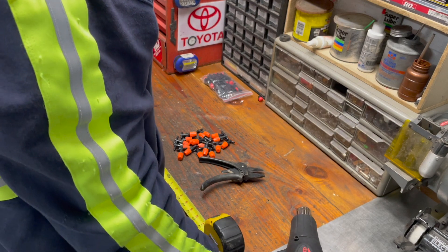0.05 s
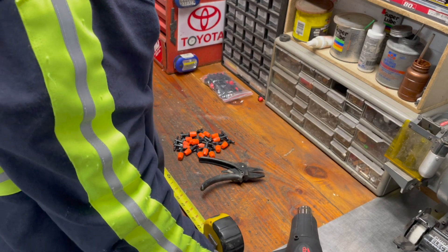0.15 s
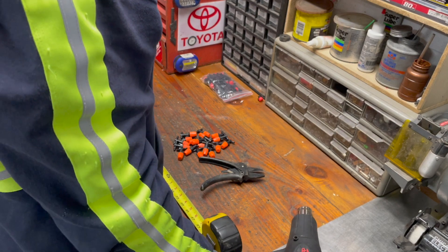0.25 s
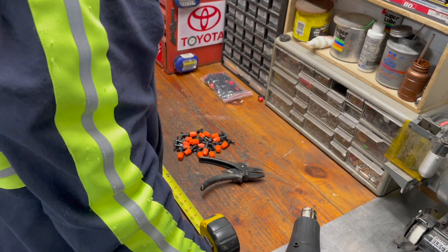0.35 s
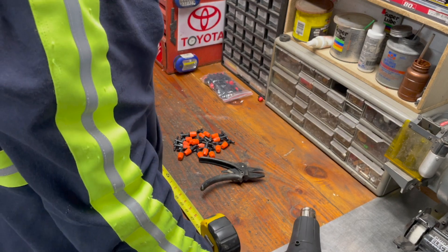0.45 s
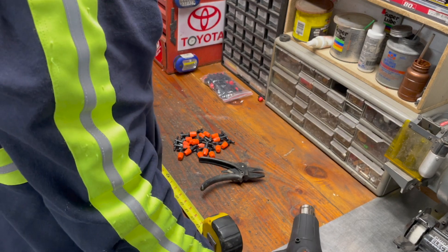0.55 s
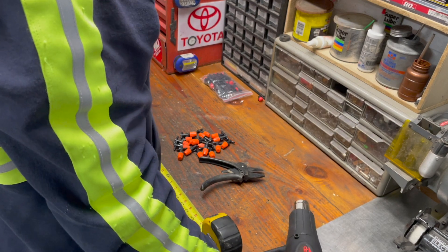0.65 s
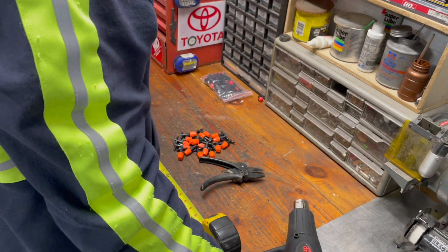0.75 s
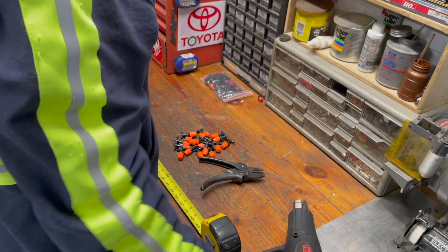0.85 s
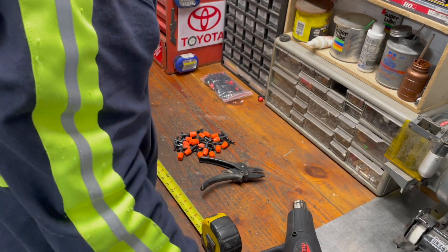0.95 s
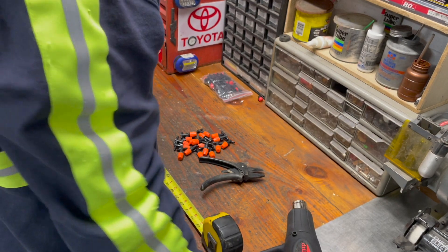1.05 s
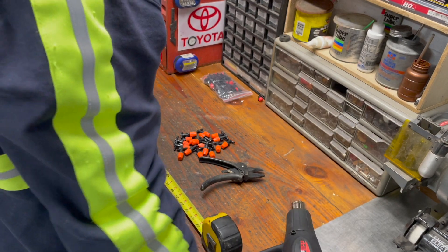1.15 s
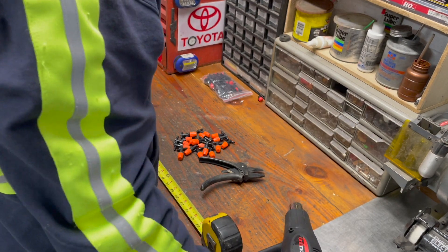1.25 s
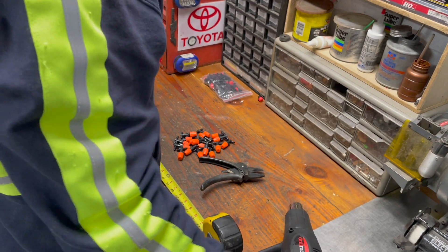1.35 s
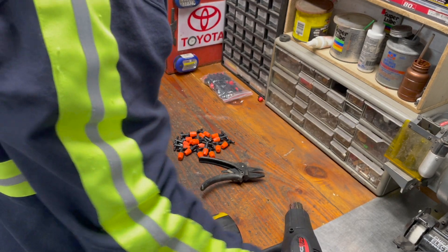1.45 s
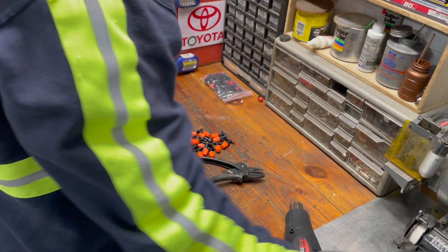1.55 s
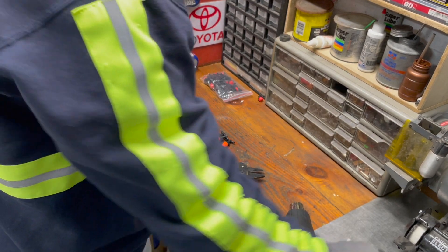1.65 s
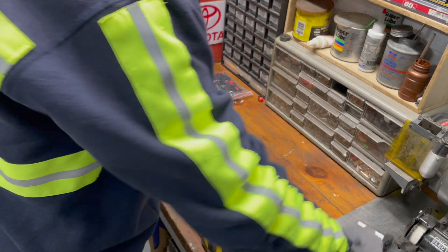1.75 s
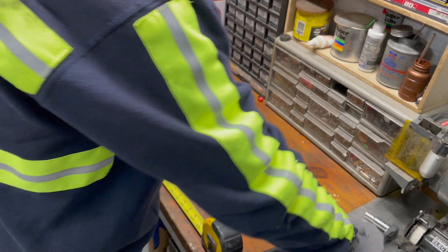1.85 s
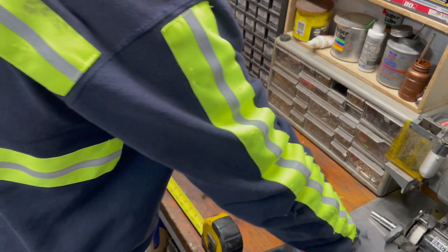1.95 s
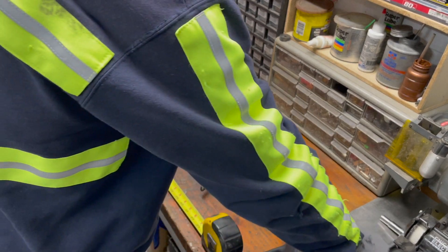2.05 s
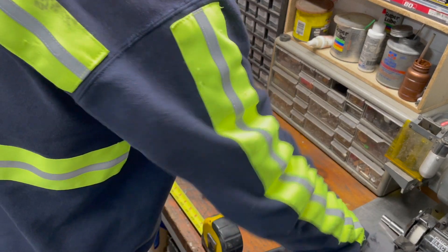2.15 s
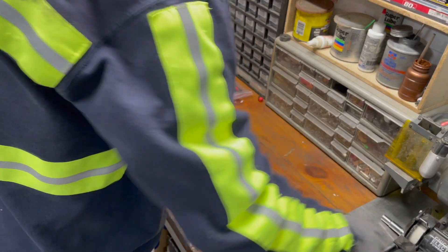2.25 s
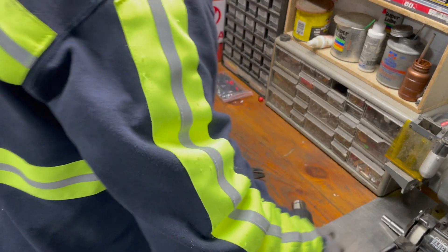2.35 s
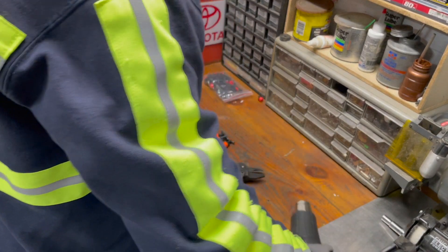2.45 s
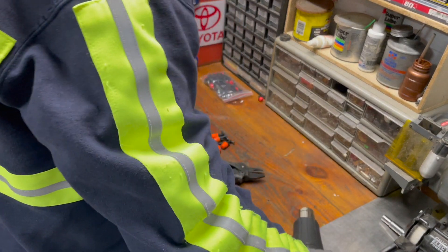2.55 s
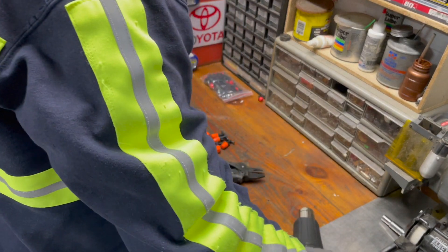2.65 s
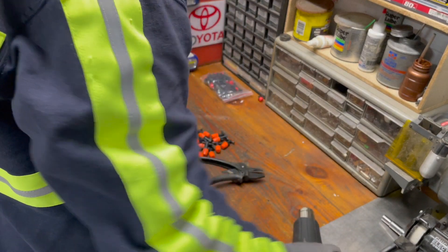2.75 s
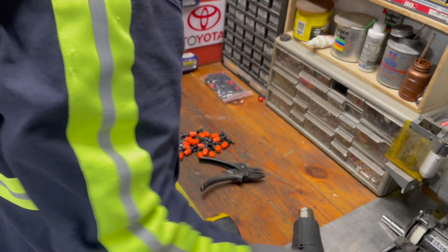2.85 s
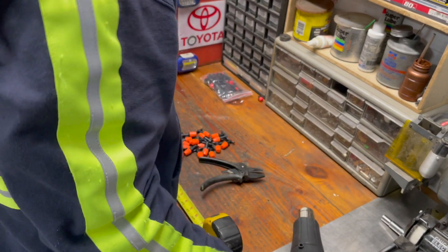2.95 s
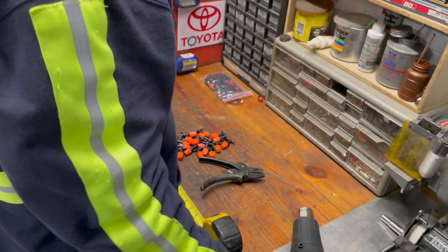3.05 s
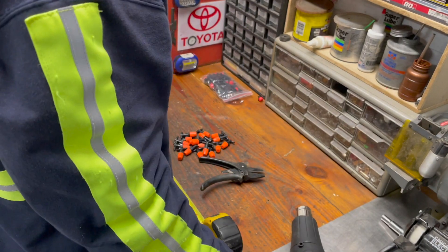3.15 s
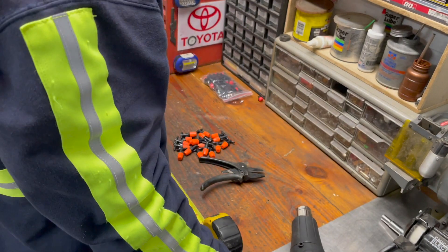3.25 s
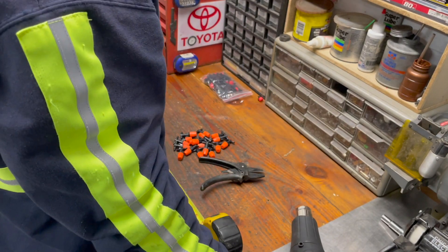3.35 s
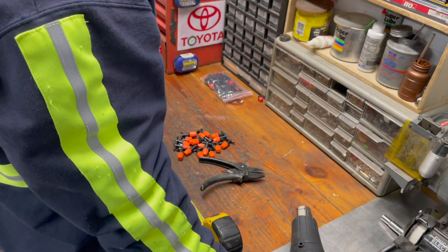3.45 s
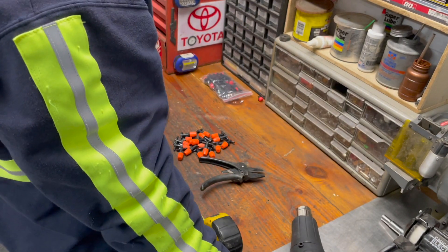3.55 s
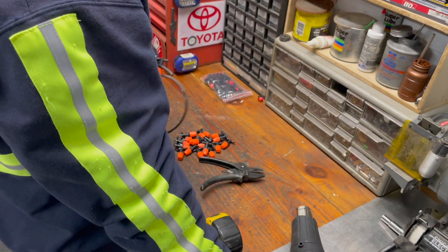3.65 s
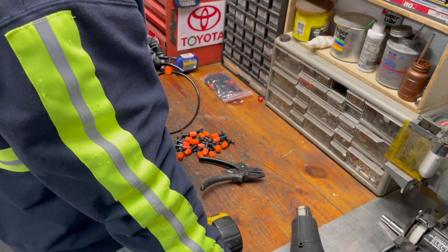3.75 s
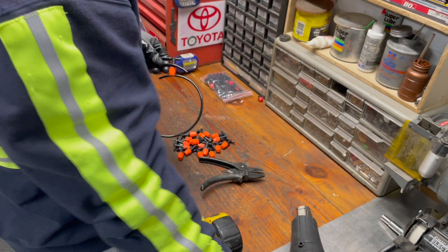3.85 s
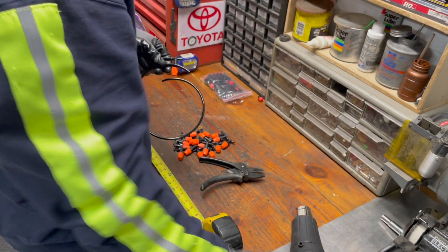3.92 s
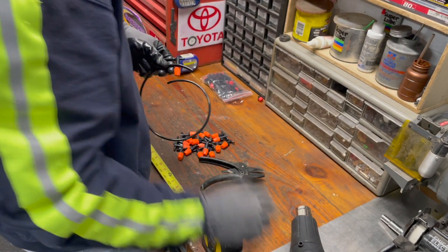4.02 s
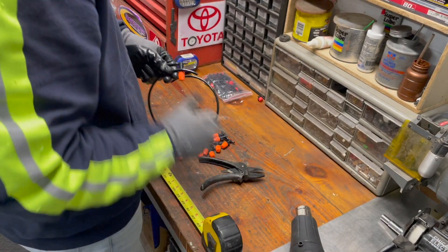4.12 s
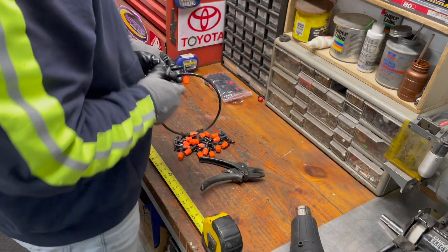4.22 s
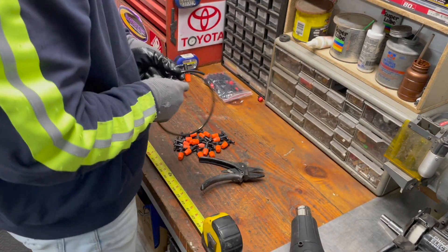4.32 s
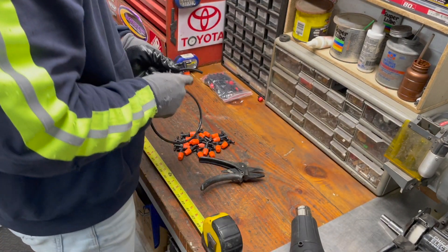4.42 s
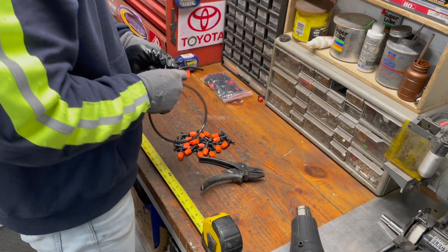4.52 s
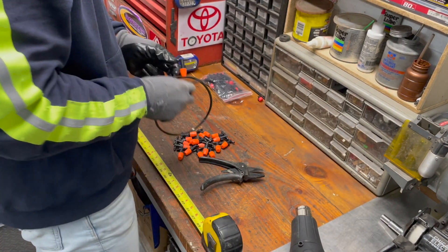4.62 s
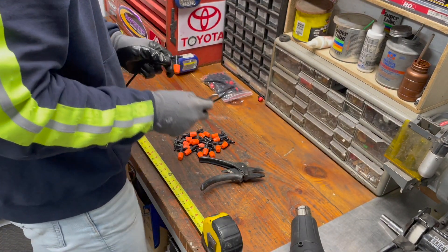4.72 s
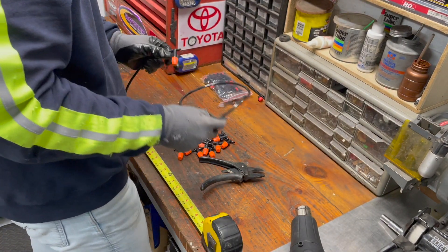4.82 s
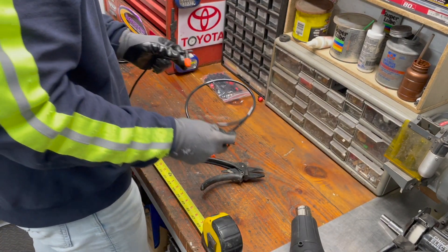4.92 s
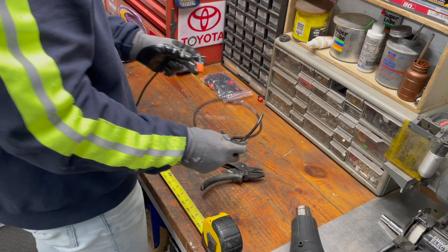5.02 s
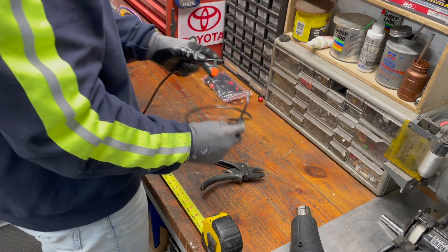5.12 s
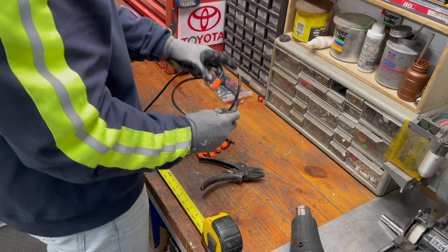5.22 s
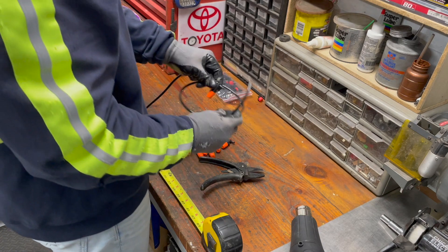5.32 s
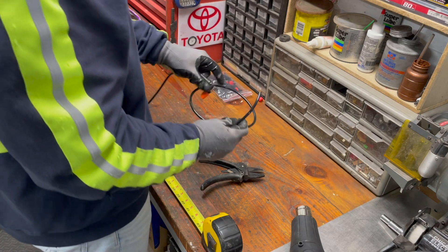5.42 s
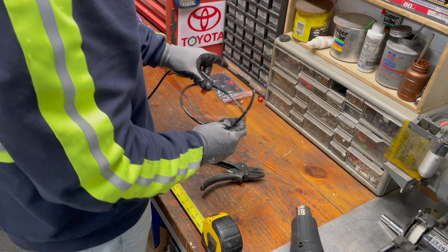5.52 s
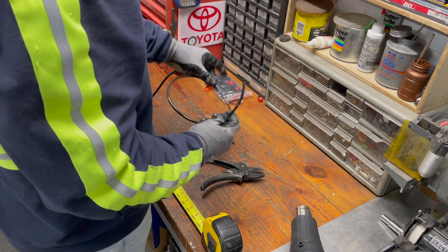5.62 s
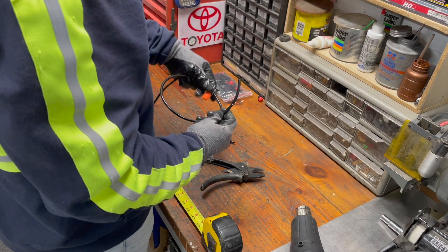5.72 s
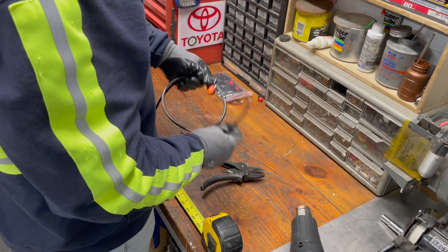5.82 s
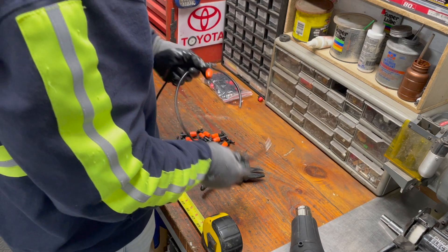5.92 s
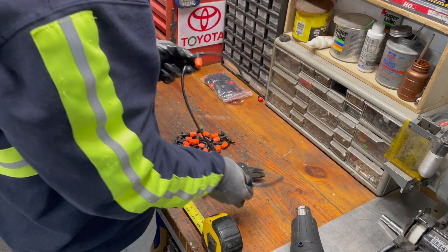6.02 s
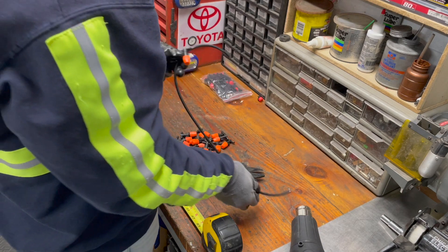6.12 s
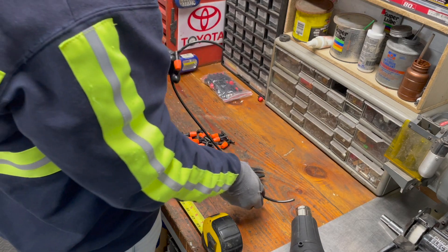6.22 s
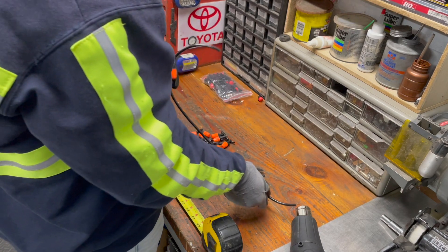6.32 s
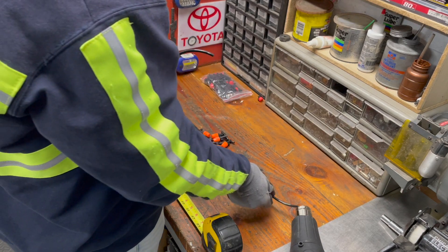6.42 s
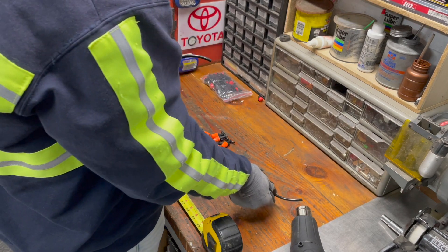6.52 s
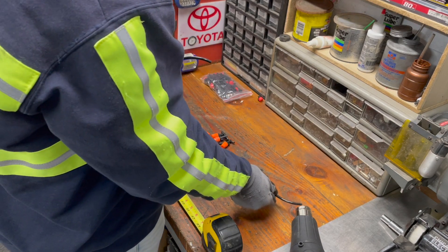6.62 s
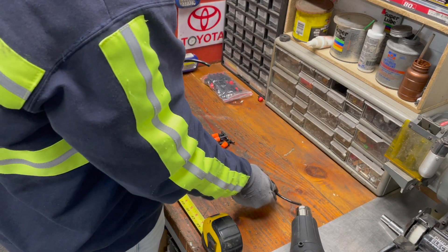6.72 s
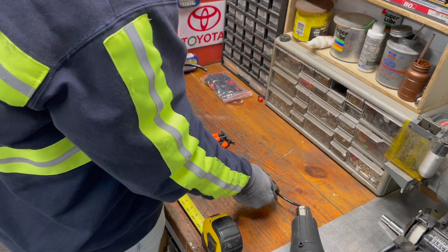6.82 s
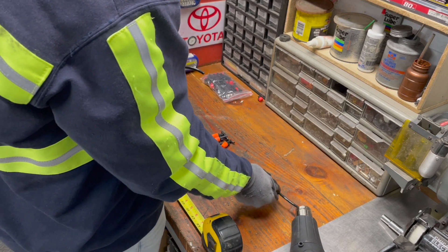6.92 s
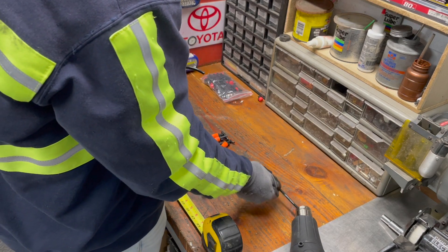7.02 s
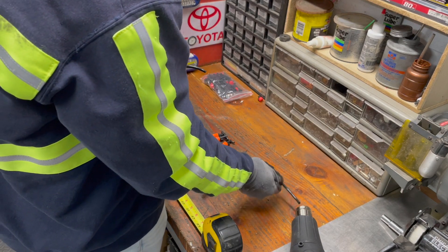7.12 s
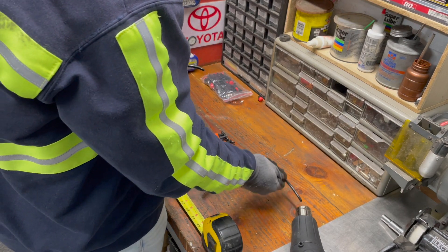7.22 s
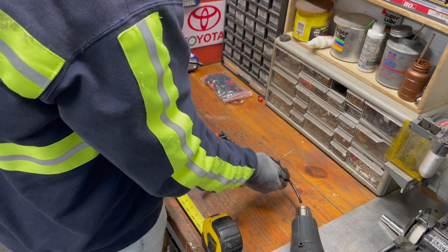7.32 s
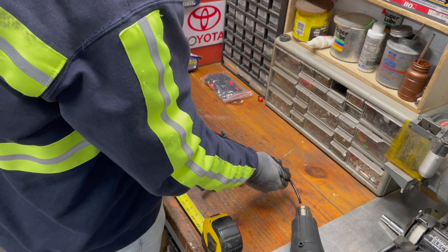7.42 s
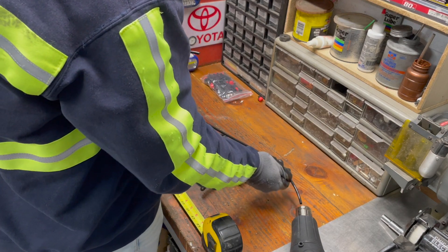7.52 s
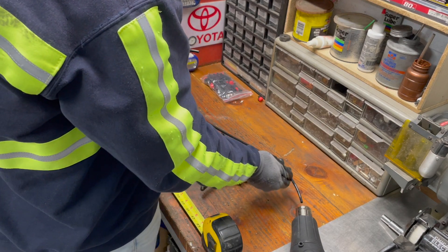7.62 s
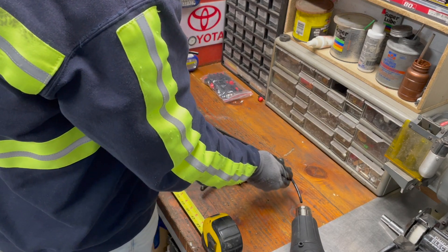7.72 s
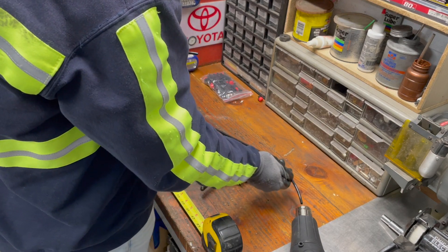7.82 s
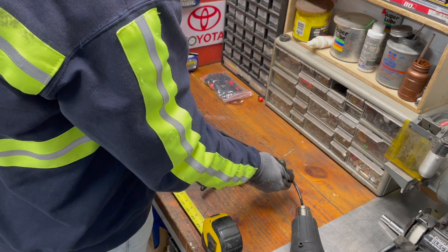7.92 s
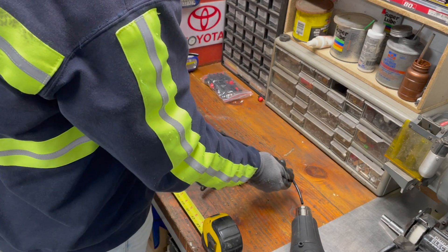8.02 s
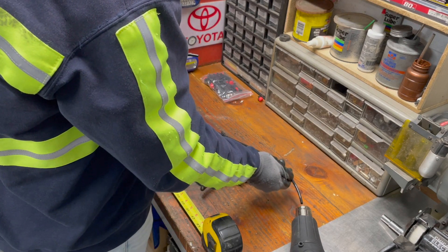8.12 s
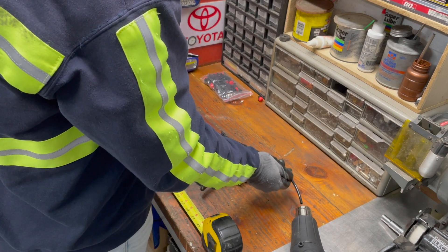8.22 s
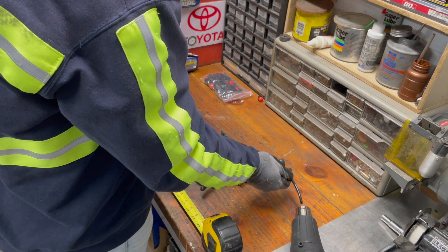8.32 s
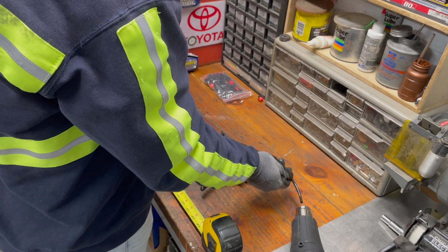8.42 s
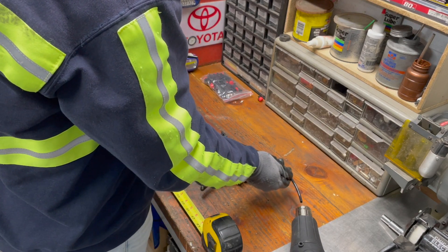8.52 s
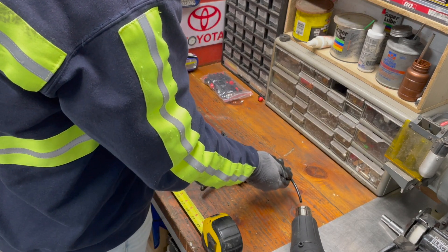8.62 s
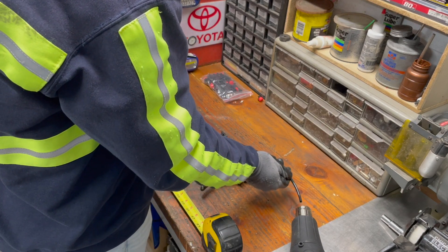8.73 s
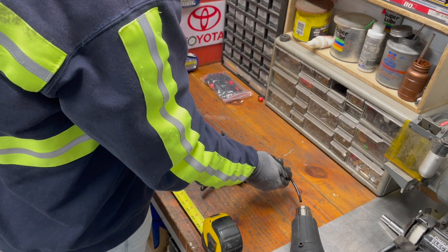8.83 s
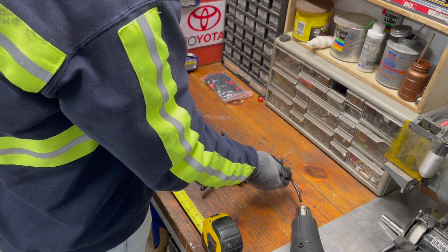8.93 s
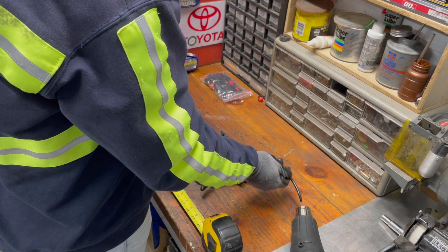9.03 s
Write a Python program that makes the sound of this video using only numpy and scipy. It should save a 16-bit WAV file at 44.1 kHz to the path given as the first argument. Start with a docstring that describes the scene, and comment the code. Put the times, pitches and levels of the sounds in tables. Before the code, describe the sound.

In a small garage, a hard plastic heat gun is shoved about on a wooden bench with uneven knocks, thuds, scrapes and faint squeaks. The handling thins out, a switch clicks crisply, and the fan quickly whines up to a steady tonal hum with rushing air. Close stereo pickup, short room reflections.

```python
"""From the start, over faint garage noise, a heat gun is shoved about and set down on a wooden bench.
Knocks excite modes of housing and board and a bench thud; stick-slip ticks make scrapes, with small squeaks.
At 3.65 s the switch snaps and bounces as brief impulses through stiff resonances.
Then the fan spins up: tones at multiples of the shaft speed over rushing air, shaped noise.
A close pair of microphone ports hears it, with the garage's decaying reflections of the handling."""
import sys
import numpy as np
from scipy import signal
from scipy.fft import rfft, irfft, next_fast_len
from scipy.io import wavfile
from scipy.ndimage import uniform_filter1d

SR = 44100
rng = np.random.default_rng(int(sys.argv[2]) if len(sys.argv) > 2 else 0)


def materialize(psi):
    """Save the field psi as 16-bit PCM at rate SR to the path in sys.argv[1].

    A 1-D psi becomes a single channel; in a 2-D psi each row is a channel.
    """
    bounded = np.clip(np.atleast_2d(psi).T, -1, 1)
    quanta = np.round(bounded * 32767).astype(np.int16)
    wavfile.write(sys.argv[1], SR, quanta)


N = 399987  # samples


def amp(db):
    """Level law: decibels to amplitude ratio."""
    return 10 ** (np.asarray(db) / 20)


def evened(x):
    """Normalisation to an rms of 1."""
    return x / np.sqrt(np.mean(x ** 2) + 1e-20)


def read(points, hz):
    """Spectral interpolation: a table's value, linear in log frequency."""
    f, value = np.transpose(points)
    return np.interp(np.log(hz + 1), np.log(f + 1), value)


def add(mix, s, sound):
    """Superposition: a sound joins the mix at s seconds."""
    part = mix[max(round(s * SR), 0):][:len(sound)]
    part += sound[:len(part)]


def curves(rows):
    """Linear interpolation in time: the columns of a table at every sample."""
    s, *columns = np.transpose(rows)
    return [np.interp(np.arange(N) / SR, s, c) for c in columns]


def wander(per_s):
    """Slow random modulation of about rms 1, smoothed from 2 * per_s steps a second."""
    steps = uniform_filter1d(rng.standard_normal(int(N / SR * per_s * 2) + 4), size=2)
    return np.interp(np.linspace(0, len(steps) - 1, N), np.arange(len(steps)), evened(steps))


def colour(x, points):
    """Minimum-phase filtering: a causal spectral shape that keeps the rms of white noise."""
    log_gain = np.log(amp(read(points, abs(np.fft.fftfreq(4096, 1 / SR)))))
    taps = np.fft.ifft(np.exp(np.conj(signal.hilbert(log_gain)))).real[:2048]
    return signal.oaconvolve(x, taps / np.linalg.norm(taps))[:len(x)]


def thin(x, low_hz):
    """Weak low radiation: a third-order high-pass removes what a small part barely radiates."""
    return signal.sosfilt(signal.butter(3, low_hz, "high", fs=SR, output="sos"), x)


def ring(x, modes, spot_hz=1200, focus_db=0, detune=1):
    """Modal synthesis that keeps white noise's rms; focus_db weakens modes away from the spot's pitch."""
    hz, width, db = np.transpose(modes)[:, :, None]
    t = np.arange(3000) / SR
    gain = amp(db - focus_db * np.log2(hz / spot_hz) ** 2) * np.sqrt(width)
    decay = np.exp(-np.pi * width * t)
    taps = (gain * decay * np.sin(2 * np.pi * hz * detune * t)).sum(0)
    return signal.oaconvolve(x, taps / np.linalg.norm(taps))[:len(x)]


def resonate(x, hz, width):
    """Heterodyning: shift the curve hz to zero, smooth and shift back, as a moving resonance."""
    turn = np.exp(2j * np.pi * np.cumsum(hz) / SR)
    r = np.exp(-np.pi * width / SR)
    smooth = signal.lfilter([1 - r], [1, -r], x / turn)
    return evened((turn * smooth).real)


# Left-right likeness of diffuse sound. Each row: frequency in Hz, correlation from 0 to 1.
LIKENESS = [(60, 0.99), (200, 0.43), (600, 0.67), (1500, 0.33), (4000, 0.61), (6500, 0.022)]


def diffuse(points, patchy_db, tilt_db=0):
    """Partial coherence: two-channel noise from random spectra with patches; tilt_db varies the treble."""
    frames, hz = N // 256 + 5, np.fft.rfftfreq(1024, 1 / SR)
    a, b, c, d, patches = rng.standard_normal((frames, 513, 5)).T
    patches = uniform_filter1d(patches, size=8, axis=0)
    patches = evened(uniform_filter1d(patches, size=16, axis=1))
    same = np.clip(read(LIKENESS, hz), -1, 1)[:, None]
    left = a + 1j * b
    right = same * left + np.sqrt(1 - same ** 2) * (c + 1j * d)
    treble = np.clip(np.log2(hz / 1500 + 1e-9), 0, 1)
    tilt_frames = np.pad(tilt_db * np.ones(N), (0, 2048), "edge")[::256][:frames]
    z = np.array([left, right])
    z *= amp(read(points, hz)[:, None] + patchy_db * patches + np.outer(treble, tilt_frames))
    return evened(signal.istft(z, nperseg=1024, noverlap=768)[1][:, :N])


# Spectrum of the garage's background. Each row: frequency in Hz, density in dB per Hz (relative).
GARAGE_COLOUR = [(20, -3.5), (35, 1), (52, 18), (75, -26), (120, -3), (300, -14.5), (1200, -30.5),
                 (4000, -32.5), (12000, -33.5), (16000, -61.5)]
GARAGE_DB = -53.5


def garage():
    """Ambient diffuse field: steady low-heavy noise with slight drifting patches."""
    return amp(GARAGE_DB) * diffuse(GARAGE_COLOUR, patchy_db=1.5)


# Decay of the garage. Each row: frequency in Hz, time to fall by 60 dB in seconds.
ROOM_T60 = [(100, 0.24), (500, 0.34), (2000, 0.29), (6000, 0.26), (12000, 0.21)]


def room(x):
    """Reverberant decay: three alternately fed sparse tails, each band dying at its own speed."""
    out, turn = 0, np.arange(len(x)) / SR * 2.3
    for k in range(3):
        taps = np.zeros((2, SR // 2))
        slots = np.arange(120, SR // 2 - 20, 20)
        at = slots + rng.integers(0, 20, (2, (SR // 2 - 121) // 20))
        np.put_along_axis(taps, at, rng.choice([-1., 1.], at.shape), 1)
        hz, t, z = signal.stft(taps, SR, nperseg=512)
        same = np.clip(read(LIKENESS, hz), -1, 1)[:, None]
        z[1] = same * z[0] + np.sqrt(1 - same ** 2) * z[1]
        decay = amp(-60 * t / read(ROOM_T60, hz)[:, None])
        tail = signal.istft(z * decay, SR, nperseg=512)[1]
        feed = np.sqrt(2 / 3) * np.cos(2 * np.pi * (turn + k / 3))
        wet = signal.fftconvolve((feed * x)[None], tail / np.linalg.norm(tail[0]), axes=1)
        out = out + wet[:, :N]
    return out


# Bounce off the bench top. Each row: frequency in Hz, lead of the right port in half turns.
BENCH_TURN = [(500, 0), (2000, .2), (3100, -.2), (4000, -.07), (5000, -.15), (6000, 0)]


def off_bench(x):
    """Reflection phase: direct sound at two ports, the bench bounce turning the right one's phase."""
    size = next_fast_len(N)
    turn = np.exp(1j * np.pi * read(BENCH_TURN, np.fft.rfftfreq(size, 1 / SR)))
    return np.array([x, irfft(rfft(x, size) * turn, size)[:N]])


SWITCH_S = 3.655  # the rattle of the switch and the start of the fan
# The shaft's approach to speed. Each row: gap in Hz at the switch, time constant in seconds.
SPEED_LAGS = [(166.5, .234), (10.27, 1.5)]
FULL_HZ, FAN_FADE_S = 189.7, 0.19


def fan():
    """Exponential approach: seconds since the switch, fade from silence, and shaft speed in Hz."""
    t = np.maximum(np.arange(N) / SR - SWITCH_S, 0)
    hz = FULL_HZ - sum(gap * np.exp(-t / lag) for gap, lag in SPEED_LAGS)
    return t, np.minimum(t / FAN_FADE_S, 1) ** 2, hz


# Spectrum of the rushing air. Each row: frequency in Hz, density in dB per Hz (relative).
AIR_COLOUR = [(55, -27.5), (120, -16), (260, -17.5), (350, -16.5), (520, -6), (635, -8.5), (700, -4.5),
              (800, 2.5), (880, -9), (950, 1.5), (1020, -3), (1200, -4.5), (1420, -12), (2200, -15),
              (2560, -12.5), (2950, -18), (3350, -16.5), (3900, -19.5), (4350, -18), (4900, -26),
              (7000, -23.5), (12000, -29), (14000, -39), (16000, -44)]
AIR_DB, AIR_DB_PER_OCTAVE = -38.5, 16.5  # at full speed, and growth per octave of shaft speed
TREBLE_DB, TREBLE_DB_PER_S = -2, 0.06  # the treble creeps up


def fan_air():
    """Turbulence noise: air through the barrel grows steeply with shaft speed."""
    t, fade, hz = fan()
    level = fade * amp(AIR_DB + AIR_DB_PER_OCTAVE * np.log2(hz / FULL_HZ))
    return level * diffuse(AIR_COLOUR, patchy_db=1.5, tilt_db=TREBLE_DB + TREBLE_DB_PER_S * t)


# Resonances and dips that raise or lower the tones outside SWELLING, and the strain whine, as they
# glide past. Each row: frequency in Hz, half width in Hz, change in dB.
BARREL = [(349, 12, 11.5), (1170, 77, 12), (1470, 50, 21), (1680, 57, 16), (1830, 70, 22), (2520, 120, 9),
          (2800, 75, -1), (3200, 140, -10), (6360, 290, -11)]


def barrel_db(hz):
    """Resonance curves: the summed rise or dip in dB at a frequency."""
    return sum(db / (1 + ((hz - f) / width) ** 2) for f, width, db in BARREL)


# Loud orders that sit still between the ports. Each entry, by multiple of the shaft speed:
# left minus right in dB, lead of the right in turns.
LOUD_ORDERS = {1: (-4, .03), 5: (-4.5, .03), 8: (1, .01), 9: (-.5, -.02), 10: (-2, .02), 11: (-.5, -.05),
               14: (.5, 0), 20: (-1, -.03)}
# Orders unlike the plain ones. Each entry, by multiple of the shaft speed: level at full speed in dB.
ORDER_DB = {2: -64, 3: -58, 4: -54, 6: -55, 18: -59, 20: -58.5, 23: -67, 28: -69, 31: -72, 33: -67, 35:
            -63.5, 41: -68, 45: -70, 51: -72}
# Multiples of the shaft speed that swell and sink slowly.
SWELLING = [1, 5, 7, 8, 9, 10, 11, 14, 15, 27]
# Their levels. Each row: time in seconds, then the level in dB of each order in SWELLING.
SWELLS = [(3.75, -77, -85, -80, -77, -80, -78, -82, -84, -80, -90),
          (4.0, -41, -66, -68, -66, -66, -60, -72, -79, -80, -82),
          (4.13, -53, -57, -55, -57, -50, -64, -62, -72, -68, -80),
          (4.28, -44, -58, -49, -62, -60, -56, -52, -68, -60, -82),
          (4.45, -53, -56, -57, -56, -62, -59, -55, -66, -65, -84),
          (4.64, -63, -52, -57, -52, -61, -58, -64, -60, -57, -80),
          (4.8, -49, -52, -60, -49, -51, -58, -66, -58, -54, -77),
          (5.05, -48.5, -51, -61, -45, -54, -57, -53, -57, -56, -73),
          (5.4, -50, -41, -58, -45, -50, -50, -56, -59, -60, -69),
          (6.1, -46, -41, -52, -42, -50, -55, -60, -68, -66, -68),
          (7.0, -44, -43, -51, -42.5, -46.5, -51.5, -57, -82, -63, -64),
          (7.6, -44, -52, -52, -41.5, -44.5, -51, -59, -62, -56, -64),
          (8.0, -44, -47, -53, -40.5, -45.5, -52, -64, -53, -58, -61),
          (8.65, -43, -49, -60, -40.5, -46.5, -52, -68, -53, -58, -61.5),
          (9.07, -43, -45, -58, -40, -45.5, -53, -64, -56, -61, -61)]
ORDER_12_DB, ORDER_SLOPE_DB = -64.5, -9.5  # a plain order: the twelfth at full speed, change per octave
SPIN_TREMBLE = 12  # extra tremble while the shaft is short of full speed
STRAIN_ORDER, STRAIN_DB = 15, -72.5  # whines while the motor is far from full speed
STRAIN_TOP_HZ = 1950  # the housing passes the whine up to here
BEATING_ORDER, BEATING_DB = 5, 3  # throbs unevenly in the air stream


def fan_tones():
    """Shaft orders: harmonics swell and fade by standing waves as they glide, differently at each port."""
    t, fade, hz = fan()
    on = t > 0
    t, hz = t[on], hz[on]
    turns = np.cumsum(hz * (1 + 0.001004 * wander(20)[on])) / SR
    few, seconds = hz[::200], t[::200]  # slow curves need few points
    spin_db = 60.0 * np.log10(few / few[-1])  # tones strengthen steeply with speed, high orders most
    ripple = rng.standard_normal((2, 600))  # gain and side lean, one value every 30 Hz
    wavers = rng.standard_normal((84, 30))  # per order, four steps a second
    flutter_db = wander(25)[on]
    trembles = rng.standard_normal((84, 150))  # per order, twenty-five steps a second
    swells = dict(zip(SWELLING, curves(SWELLS)))
    short_of_speed = 1 - hz / FULL_HZ
    out = np.zeros((2, N))
    for k in range(1, 84):
        phase, lead = rng.random(), 0.046 * rng.standard_normal()
        swell, lean = (np.interp(k * few / 30, np.arange(600), r) for r in ripple)
        swell = np.minimum(swell - swell[-400:].mean(), .5)  # dips go deep, peaks do not
        depth_db, pan_db = 2.8, 4 * lean
        if k in LOUD_ORDERS:
            depth_db, (pan_db, lead) = 1.5, LOUD_ORDERS[k]
        if k in swells:
            db = swells[k][on]
        else:
            plain_db = ORDER_12_DB + ORDER_SLOPE_DB * np.log2(k / 12)
            db = ORDER_DB.get(k, plain_db) + (1.0 + 0.11 * k) * spin_db
            db += barrel_db(k * few) - barrel_db(k * few[-1])
            db += depth_db * (swell + .7 * np.interp(4 * seconds, np.arange(30), wavers[k]))
            db = np.interp(t, seconds, db)
        tremble_depth_db = 1.1 * (1 + SPIN_TREMBLE * short_of_speed) * min(k, 5) / 5 * (1 + k / 20)
        tremble_db = tremble_depth_db * np.interp(25 * t, np.arange(150), trembles[k])
        gain = np.sqrt(2) * amp(db + flutter_db + tremble_db)
        side = np.interp(t, seconds, amp(pan_db / 2 + np.zeros(len(few))))
        if k == BEATING_ORDER:
            gain *= amp(BEATING_DB * (wander(24)[on] - .6))
        if k == STRAIN_ORDER:
            whine = amp(STRAIN_DB + barrel_db(k * hz) + 2.5 * wander(30)[on])
            gain += whine * 2 * short_of_speed / (1 + (k * hz / STRAIN_TOP_HZ) ** 10)
        out[0, on] += side * gain * np.sin(2 * np.pi * (k * turns + phase))
        out[1, on] += gain / side * np.sin(2 * np.pi * (k * turns + phase + lead))
    return fade * out


# Stiff modes of the switch. Each row: frequency in Hz, width in Hz, level in dB.
SWITCH_MODES = [(1000, 120, -12), (1490, 170, 4), (1640, 170, 3), (2000, 200, -8), (2400, 250, -1),
                (2720, 400, -1), (3105, 200, 4), (3900, 900, 0), (5060, 380, 2), (5760, 500, -2),
                (6450, 600, 1), (7300, 1300, 2), (10500, 3400, -23)]
# Snaps of the rocker. Each row: time in seconds, relative level in dB.
SNAPS = [(3.648, -28), (3.656, -15), (3.659, 5.5), (3.662, -6), (3.664, -9), (3.671, -18)]
SWITCH_DB, SWITCH_T60, SWITCH_LOW_HZ, SNAP_DB = -20.5, 0.039, 1300, -14.5  # T60 in seconds


def switch():
    """Impulse excitation: the rocker snaps and bounces, with a short rattle, in small stiff parts."""
    out, t = np.zeros(N), np.arange(6000) / SR
    shape = (1 - np.exp(-t / 0.0019)) * amp(-60 * t / SWITCH_T60)
    add(out, SWITCH_S, amp(SWITCH_DB) * shape * rng.standard_normal(len(t)))
    for s, db in SNAPS:
        add(out, s, amp([SNAP_DB + db]))
    return thin(ring(out, SWITCH_MODES), SWITCH_LOW_HZ)


# Chirps of rubbing plastic. Each row: start in seconds, frequency in Hz, level in dB, length in seconds.
SQUEAKS = [(1.344, 1247, -40.5, 0.068), (1.503, 1507, -44, 0.17), (2.096, 1372, -44, 0.11),
           (2.728, 987, -46, 0.066), (3.227, 934, -67, 0.021), (3.388, 2330, -76, 0.029)]


def squeaks():
    """Narrow-band resonance: rubbing plastic gives brief, slightly unsteady tones."""
    out = np.zeros(N)
    for s, hz, db, length in SQUEAKS:
        count = round(length * SR)
        tone = resonate(rng.standard_normal(8000)[:count], np.full(count, hz), width=19)
        add(out, s, amp(db) * np.hanning(count) * tone)
    return out


# The gun's place on the bench. Each row: time in seconds, upper over lower board modes in dB,
# level of the top treble in dB.
BENCH_PLACE = [(0, 2, -4), (.35, -2.5, -3.5), (.64, 4.5, -9.5), (1.0, -6, 3), (1.14, 8, 3.5), (1.3, 0, -5),
               (1.6, 5, 2.5), (1.85, 2, -2.5), (2.06, 9, 4.5), (2.43, 3.5, -3), (2.51, 2.5, -1),
               (3.1, 3, -7.5), (3.6, 1, -1)]
# Board modes, the lower two first. Each row: frequency in Hz, width in Hz, level in dB.
BOARD = [(224.4, 70, -3), (280, 69, -2.5), (357, 60, 1.5), (442, 90, -4), (547, 150, -0.5),
         (760, 140, -12.5)]
BOARD_LOW_HZ = 121


def board_ring(x):
    """Modal participation: where the gun lies shares out the board's lower and upper modes."""
    upper_db = curves(BENCH_PLACE)[0]
    lower = amp(-upper_db / 2 - 8.5) * ring(x, BOARD[:2])
    upper = amp(upper_db / 2 - 3) * ring(x, BOARD[2:])
    return thin(lower + upper, BOARD_LOW_HZ)


def with_treble(x):
    """Spectral shelving: treble above about 9500 Hz rises and falls as the gun moves over the bench."""
    top = signal.sosfiltfilt(signal.butter(3, 9500, "high", fs=SR, output="sos"), x)
    return x + (amp(curves(BENCH_PLACE)[1]) - 1) * top


# Strokes of the gun and its cord over the wood. Each row: start in seconds, length in seconds,
# shell level in dB, hiss level in dB, bench rumble level in dB, rubbing pitch in Hz.
STROKES = [(-.08, 0.24, -63.5, -89, -48.5, 940), (0.257, 0.41, -53, -58, -44, 1120),
           (0.551, 0.23, -55, -58, -58, 1089), (0.761, 0.18, -73, -77, -64.5, 1250),
           (1.038, 0.31, -51, -58, -48.5, 1300), (1.344, 0.26, -45.5, -48.5, -91, 1206),
           (1.489, 0.5, -41.5, -41, -50.5, 1139), (1.911, 0.28, -45, -53, -61.5, 1072),
           (2.13, .22, -60.5, -76, -65.5, 1356), (2.394, .12, -51.5, -59, -54, 885),
           (2.498, 0.17, -52, -72, -50.5, 1834), (2.66, .1, -61.5, -71, -70, 1600),
           (2.754, .14, -62.5, -68, -61.5, 1024), (2.952, 0.4, -69.5, -73.5, -67, 1087),
           (3.465, 0.19, -76, -76.5, -81, 971), (3.682, 0.24, -60, -67.5, -63.5, 1024)]
STROKE_PEAK, STROKE_ENDS_DB = 0.31, -19  # firmest at this share of the length, softer at both ends


def strokes():
    """Contact pressure: gains of shell, hiss and rumble, and the rubbing pitch weighted by shell gain."""
    t, gains, hz = np.arange(N) / SR, np.zeros((3, N)), np.zeros(N)
    for s, length, *db, pitch_hz in STROKES:
        u = (t - s) / length
        off = np.maximum(1 - u / STROKE_PEAK, (u - STROKE_PEAK) / (1 - STROKE_PEAK))
        press = amp(STROKE_ENDS_DB * off ** 2)
        gains += np.outer(amp(db), press)
        hz += amp(db[0]) * press * pitch_hz
    return gains, np.where(gains[0] > 1e-12, hz / (gains[0] + 1e-30), 1000)


# Housing modes, also struck by the knocks. Each row: frequency in Hz, width in Hz, level in dB.
SHELL = [(617, 83, -19.5), (831, 35, -0.5), (1016, 74, 8.5), (1273, 41, -2.5), (1250, 94, -0.5),
         (1400, 65, -1), (1630, 340, 8.5), (1950, 110, 4.5), (2325, 250, 3), (2700, 460, 2), (3080, 310, 3),
         (4070, 290, 0.5)]
# Spectrum of the rubbing hiss. Each row: frequency in Hz, density in dB per Hz (relative).
HISS = [(1200, -26.5), (2500, 0), (5000, -4), (8000, 12.5), (12500, -2.5), (16000, -15.5)]
# Spectrum of the bench rumble. Each row: frequency in Hz, density in dB per Hz (relative).
RUMBLE = [(50, -22), (90, 18), (140, 9), (250, 7), (450, 2), (800, -25)]
SHELL_LOW_HZ = 594
RUB_DB, RUB_WIDTH_HZ = -17.5, 180  # a wide band about the rubbing pitch
STREAK_DB, STREAK_WANDER = -13.5, 0.15  # three streaks near that pitch, drifting by this share
MODE_SLIDE = 0.032  # housing modes slide by this share under a moving grip


def scrape():
    """Stick-slip friction: dense uneven ticks drive housing, rubbed spot, hiss and bench."""
    (shell, hiss, rumble), hz = strokes()
    slips_db = 4.5 * wander(400) + 3.5 * np.array([wander(30) for _ in range(3)])
    ticks = evened(rng.standard_normal((3, N)) * amp(slips_db))
    streaks = 0
    for ratio in (.82, 1.02, 1.22):
        sway = amp(1.2 * wander(25))
        streak_hz = hz * ratio * (1 + STREAK_WANDER * wander(7.0))
        streaks = streaks + sway * resonate(ticks[0], streak_hz, width=17)
    spot_hz = hz * (1 + 0.068 * wander(14))
    spot = resonate(ticks[0], spot_hz, RUB_WIDTH_HZ)
    spot = resonate(spot, spot_hz, RUB_WIDTH_HZ)
    modes = 0
    for f, width, db in SHELL:
        modes = modes + amp(db) * resonate(ticks[0], f * (1 + MODE_SLIDE * wander(6)), width)
    housing = amp(-19) * modes + amp(RUB_DB) * spot + amp(STREAK_DB) * streaks
    bench = colour(ticks[2], RUMBLE) + amp(-10) * board_ring(ticks[2])
    return shell * thin(housing, SHELL_LOW_HZ) + hiss * colour(ticks[1], HISS) + rumble * bench


# Knocks of the gun on the bench. Each row: start in seconds, shell level in dB, crack level in dB,
# board level in dB, bench thud level in dB, struck spot's pitch in Hz, rattle's 60 dB decay in seconds.
KNOCKS = [(.039, -44, -69, -36.5, -37.5, 795, 0.039), (.133, -36, -45, -28.5, -47, 980, 0.045),
          (.137, -31, -39.5, -26, -40, 930, 0.022), (0.154, -52.5, -45, -35.5, -22.5, 693, 0.0097),
          (.203, -38.5, -50.5, -30.5, -38.5, 707, 0.083), (.227, -37, -38.5, -47, -41, 774, 0.18),
          (.33, -22.5, -23.5, -19.5, -31.5, 966, 0.054), (.343, -22.5, -19.5, -19, -14, 1200, 0.084),
          (0.379, -20.5, -12, -29, -24, 1170, 0.048), (.408, -23.5, -29, -23, -43, 986, 0.072),
          (0.426, -34.5, -34, -28.5, -45, 1210, 0.028), (0.579, -42, -53, -34.5, -39.5, 1260, 0.11),
          (.63, -29, -39, -38.5, -55.5, 1200, 0.067), (.636, -28.5, -20.5, -23.5, -33, 1220, 0.043),
          (.984, -70, -49, -48, -54, 705, 0.087), (1.008, -71, -57, -42, -42, 705, 0.076),
          (1.038, -40.5, -50, -41, -48, 1170, 0.13), (1.05, -35, -50, -36, -49.5, 1310, 0.16),
          (1.083, -39, -33, -28.5, -50, 1400, 0.043), (1.108, -33, -53, -33, -57.5, 1100, 0.12),
          (1.119, -22, -27.5, -28, -38.5, 1210, 0.072), (1.134, -28, -29.5, -23.5, -44, 1370, 0.084),
          (1.178, -60, -28, -34.5, -43, 1280, 0.029), (1.198, -33.5, -32, -32.5, -45, 690, 0.12),
          (1.292, -33.5, -47.5, -44, -53, 1210, 0.059), (1.319, -36.5, -59, -49, -62, 1910, 0.1),
          (1.352, -37.5, -48, -43.5, -54.5, 1250, 0.075), (1.378, -37, -53, -60.5, -61.5, 1178, 0.1),
          (1.408, -36, -41.5, -54.5, -65, 1220, 0.048), (1.414, -36.5, -41, -58, -67, 1256, 0.11),
          (1.589, -12, -13, -11.5, -23.5, 1247, 0.053), (1.609, -20.5, -18.5, -15, -22.5, 1183, 0.064),
          (1.748, -46, -31.5, -50, -60.5, 2300, 0.061), (1.803, -41.5, -43.5, -48, -63.5, 1098, 0.046),
          (1.85, -41, -42.5, -50, -61.5, 2600, 0.044), (2.024, -41, -36, -56, -61, 1200, 0.12),
          (2.055, -24.5, -15.5, -43.5, -36, 900, 0.059), (2.064, -17.5, -12.5, -24, -27.5, 1060, 0.069),
          (2.387, -53, -46.5, -64, -53.5, 2220, 0.1), (2.426, -29, -40, -18.5, -26, 1920, 0.03),
          (2.443, -35.5, -44, -23, -19, 789, 0.038), (2.492, -35, -39, -40, -36, 997, 0.09),
          (2.505, -19.5, -21.5, -21, -26.5, 1810, 0.048), (2.755, -44, -68, -58.5, -65, 970, 0.066),
          (2.785, -41, -47, -44.5, -63, 1113, 0.084), (3.043, -51, -60.5, -71, -67.5, 2353, 0.072),
          (3.067, -47.5, -45.5, -45, -57, 980, 0.11), (3.105, -53.5, -65, -43, -48, 1000, 0.041),
          (3.23, -54.5, -59.5, -58, -56, 930, 0.063), (3.501, -59, -67, -65.5, -67.5, 900, 0.1)]
# Modes of the bench top. Each row: frequency in Hz, level in dB, 60 dB decay in seconds.
BENCH = [(107.8, -13.5, 0.16), (135.1, 0.5, 0.23), (162.7, -6.5, 0.2), (192, -6.5, 0.034)]
# Spectrum of the crack. Each row: frequency in Hz, density in dB per Hz (relative).
CRACK = [(1200, -32.5), (2500, -4), (5000, -4.5), (8000, 1.5), (12000, -9), (14000, -15.5), (16000, -38)]
# Ring of the steel nozzle. Each row: frequency in Hz, level in dB, 60 dB decay in seconds.
NOZZLE = [(5940, -52.5, 0.14)]
NOZZLE_KNOCK_DB = -16  # only cracks harder than this reach the nozzle
SPOT_DB, STRIKE_DB = -4.5, 11  # the struck spot's own ring; the first contact over the rattle
FRAME_HZ, FRAME_T60 = 63.6, 0.42  # T60 in seconds
FRAME_DB, FRAME_LEAN = -11.5, 0.42  # under the bench top, less after blows that favour the board


def knocks():
    """Impact excitation: blow and rattle ring housing and board, with a crack and a swelling bench thud."""
    housing, board, crack, thud, steel = np.zeros((5, N))
    t, slow = np.arange(8000) / SR, np.arange(24000) / SR
    chance = rng.standard_normal((len(KNOCKS), 3, 8000))
    phases = rng.random((len(KNOCKS), len(BENCH)))
    grips = rng.standard_normal((len(KNOCKS), len(SHELL), 1))  # the grip shifts every mode a little
    strike = np.exp(-((t - .0012) / .00006) ** 2)  # a hard contact, strongest with short rattles
    nozzle = sum(amp(db - 60 * slow / t60) * np.sin(2 * np.pi * hz * slow) for hz, db, t60 in NOZZLE)
    frame = (1 - np.exp(-slow / 0.0089)) * amp(-60 * slow / FRAME_T60)
    frame *= np.sin(2 * np.pi * FRAME_HZ * slow)
    for knock, (a, b, c), phase, grip in zip(KNOCKS, chance, phases, grips):
        s, shell_db, crack_db, board_db, thud_db, hz, t60 = knock
        t60 = np.clip(t60, .01, .4)
        shape = (1 - np.exp(-t / (0.37 * t60 ** 2))) * amp(-60 * t / t60)  # long rattles start softly
        blow = shape * (1 + 0.41 * np.exp(-t / 0.0013))
        drive = blow * a + amp(STRIKE_DB) * strike / (1 + (t60 / 0.058) ** 4)
        rung = ring(drive, SHELL, hz, focus_db=2.0, detune=1 + 0.038 * grip)
        add(housing, s, amp(shell_db) * rung)
        spot = resonate(a, np.full(len(a), hz), width=40)
        add(housing, s, amp(shell_db + SPOT_DB) * shape * spot)
        add(board, s + 0.00392, amp(board_db) * shape * c)
        add(crack, s, amp(crack_db) * blow ** 1.55 * b)
        add(steel, s, (crack_db > NOZZLE_KNOCK_DB) * amp(crack_db) * blow * b)
        boom = 0
        for (f, db, decay_s), p in zip(BENCH, phase):
            boom = boom + amp(db - 60 * slow / decay_s) * np.sin(2 * np.pi * (f * slow + 0.55 * p))
        push = (1 - np.exp(-slow / 0.0045)) * boom
        frame_db = FRAME_DB - FRAME_LEAN * (board_db - thud_db)
        add(thud, s + .004, amp(thud_db) * (push + amp(frame_db) * frame))
    nozzle_ring = signal.oaconvolve(steel, nozzle)[:N]
    return thin(housing, SHELL_LOW_HZ) + board_ring(board) + colour(crack, CRACK) + nozzle_ring + thud


def scene():
    """Superposition: handling, direct and reverberant, with fan and garage noise."""
    hits, drag, snap = with_treble(knocks()), with_treble(scrape()), switch()
    direct = off_bench(hits + snap + drag + squeaks())
    reverberant = amp(-6.5) * room(hits + amp(-1.0) * snap + amp(8.0) * drag)
    return direct + reverberant + fan_tones() + fan_air() + garage()


# Balance of the two channels. Each row: frequency in Hz, left minus right in dB.
BALANCE_DB = [(60, -2), (400, -2.5), (1300, -1.5), (2400, 1), (4400, 3), (7000, 1)]
# Overall gain: low cut, weaker band near 8 kHz, falling top. Each row: frequency in Hz, gain in dB.
OVERALL_DB = [(26, -24), (50, 0), (7000, 0), (7700, -4), (8900, -4), (9800, 0), (14500, 0), (16000, -9)]
# Left-right difference left over, nearly emptied in some treble bands.
# Each row: frequency in Hz, share from 0 to 1.
SIDE_SHARE = [(6800, 1), (7600, .01), (8900, .01), (9300, .7), (10200, .7), (10600, .01), (12800, .01),
              (13200, .8), (13700, .01)]
# Phase of right against left, rising with frequency in steps.
# Each row: frequency in Hz, lead of the right in half turns.
RIGHT_TURN = [(5500, 0), (6700, .3), (7600, 1), (8900, 1), (10600, 2), (12800, 2), (13700, 3)]
EDGE_HZ = 15900  # upper band limit


def record(dry):
    """Mid-side shaping: balance and gain, side emptied in treble bands, right phase turned, band limit."""
    size = next_fast_len(N + 4096)
    hz = np.fft.rfftfreq(size, 1 / SR)
    gain_db = np.outer([.5, -.5], read(BALANCE_DB, hz)) + read(OVERALL_DB, hz)
    left, right = rfft(dry, size) * amp(gain_db)
    mid, side = (left + right) / 2, (left - right) / 2 * read(SIDE_SHARE, hz)
    turn = np.exp(1j * np.pi * read(RIGHT_TURN, hz))
    stereo = irfft(np.array([mid + side, (mid - side) * turn]), size)[:, :N]
    band = signal.firwin(511, EDGE_HZ, window=("kaiser", 9), fs=SR)
    return signal.oaconvolve(stereo, band[None], "same")


dry = scene()
out = record(dry)
materialize(out)
```